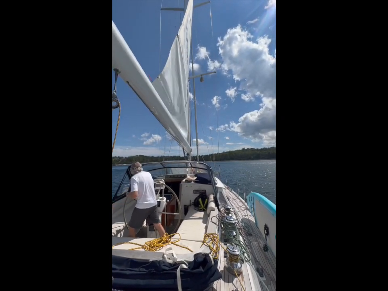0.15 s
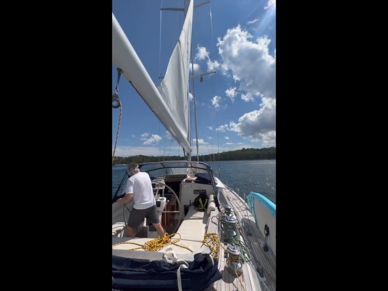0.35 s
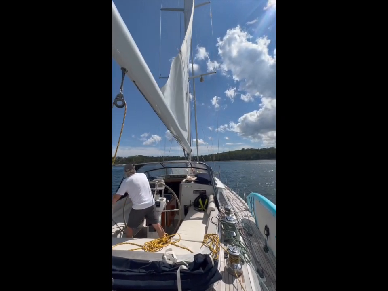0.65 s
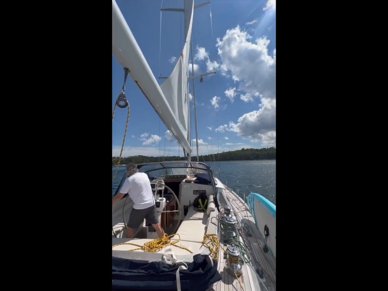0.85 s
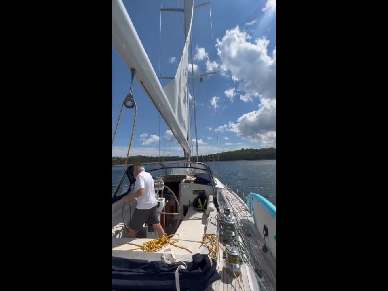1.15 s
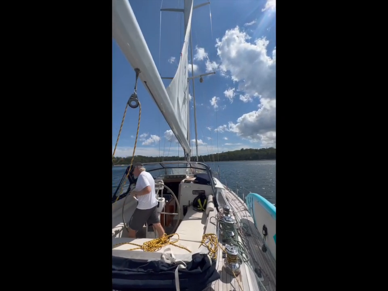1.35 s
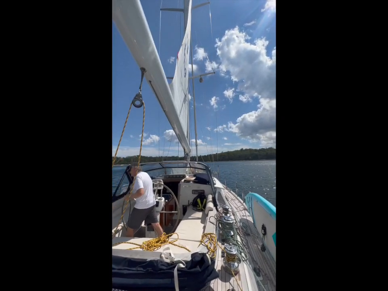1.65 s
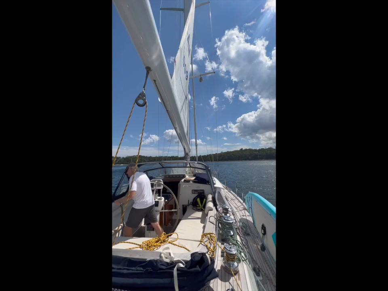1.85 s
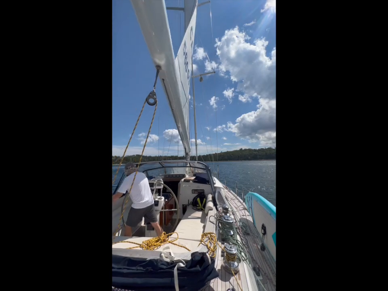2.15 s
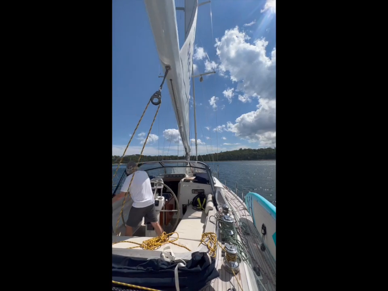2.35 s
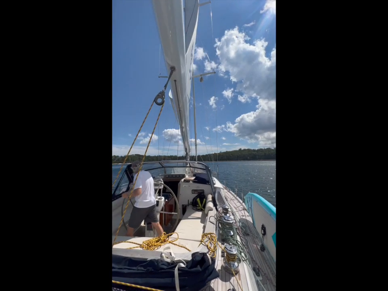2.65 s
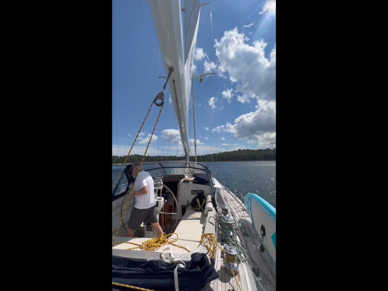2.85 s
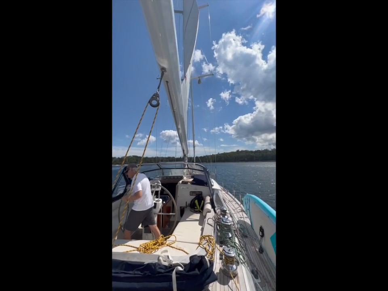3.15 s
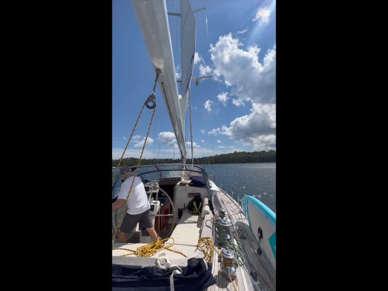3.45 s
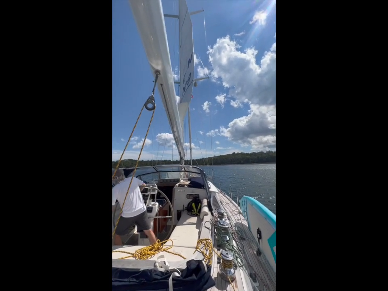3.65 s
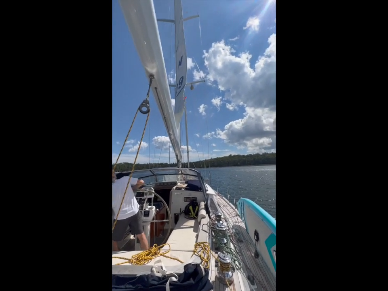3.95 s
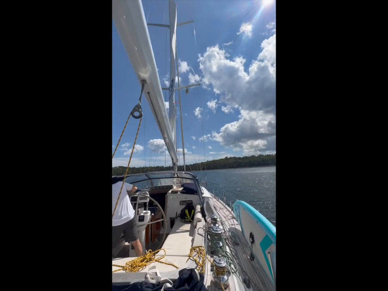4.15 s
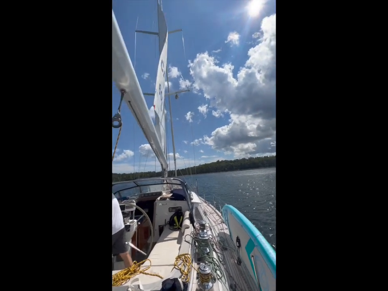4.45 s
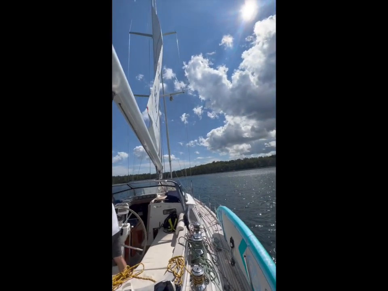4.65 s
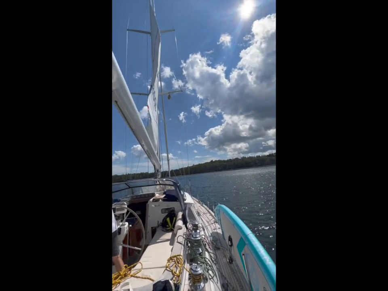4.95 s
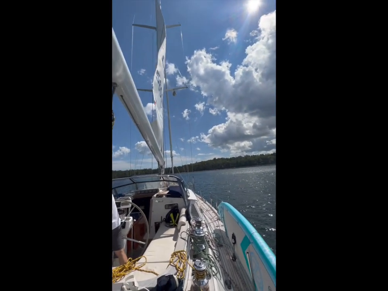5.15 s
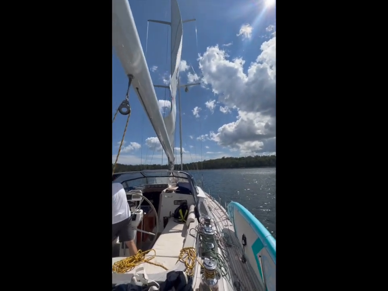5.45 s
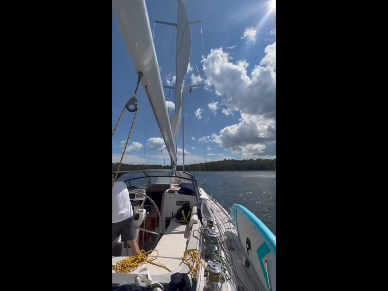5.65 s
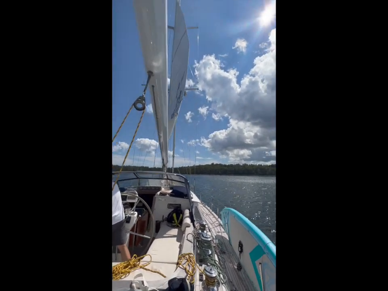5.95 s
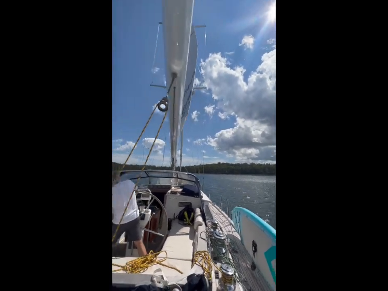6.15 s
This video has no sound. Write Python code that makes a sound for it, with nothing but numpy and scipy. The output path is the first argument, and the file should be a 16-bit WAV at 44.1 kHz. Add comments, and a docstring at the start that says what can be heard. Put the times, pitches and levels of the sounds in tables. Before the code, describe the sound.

Close in an open sailboat cockpit, a hand winch turns in bursts. Eight fast ratchet knocks, each grinding over, give way to heavy deck thuds, a brief sheave squeak and a sharp jerk of line. A second burst ends in bright slipping rope hiss; a third is short. A quieter stretch of soft bumps and light ticks follows before a last burst. Phone stereo, dry, with faint water beneath.

```python
"""A ratchet winch in a sailboat's cockpit hauls a line in bursts: each tooth knocks, then grinds over.
Knock and grind drive the resonances of the drum, and the rope dragging on it excites them too.
Slipping rope fibres hiss and rasp, gear thuds on the hollow deck, loose pawls tick and a sheave squeaks,
all as excited resonances, gliding tones or shaped noise. The slack sail rumbles and water adds noise.
A phone's two microphone ports hear it with a phase step between them."""
import sys
import numpy as np
from scipy import signal
from scipy.fft import rfft, irfft
from scipy.io import wavfile

SR = 44100
rng = np.random.default_rng(int(sys.argv[2]) if len(sys.argv) > 2 else 0)


def wrap_up_sound(samples):
    """Save the sound to the file named by the first command line argument, as 16-bit audio."""
    columns = np.atleast_2d(samples).T
    # keep every value between -1 and 1, then stretch to whole-number steps
    tamed = np.clip(columns, -1, 1)
    steps = np.round(tamed * 32767).astype(np.int16)
    wavfile.write(sys.argv[1], SR, steps)


N = 277477   # length [samples]
FFT_SIZE = 2 ** 19
OPPOSED_HZ = 12000   # from here up the direct gear sound reaches the ports in opposite phase


def amp(db):
    """Decibels to amplitude gain: 20 dB is a factor of ten."""
    return 10 ** (np.asarray(db) / 20)


def rms_one(x):
    """Normalize to unit root mean square."""
    return x / np.sqrt(np.mean(x ** 2) + 1e-20)


def in_time(rows):
    """Linear interpolation of a curve's columns, sample by sample."""
    s, *columns = np.transpose(rows)
    return [np.interp(np.arange(N) / SR, s, column) for column in columns]


def at_hz(points):
    """Interpolation of a spectrum along log frequency, on the transform's grid."""
    hz, value = np.transpose(points)
    grid_hz = np.arange(FFT_SIZE // 2 + 1) * SR / FFT_SIZE
    return np.interp(np.log(grid_hz + 1), np.log(hz + 1), value)


def through(x, response):
    """Linear filtering: the spectrum is multiplied by a frequency response."""
    return irfft(rfft(x, FFT_SIZE) * response)[:N]


def band(x, order, hz, kind):
    """Butterworth filtering: a maximally flat pass band."""
    return signal.sosfilt(signal.butter(order, hz, kind, fs=SR, output="sos"), x)


def drift(rate_hz):
    """Slow random modulation: noise through a double real pole, unit rms."""
    r = np.exp(-2 * np.pi * rate_hz / SR)
    settle = 9000   # samples dropped
    noise = rng.standard_normal(N + settle)
    return rms_one(signal.lfilter([1], [1, -2 * r, r * r], noise)[settle:])


def grains(per_s, spread_db):
    """Stick-slip friction as shot noise: random slips of uneven size, unit rms."""
    sizes = amp(spread_db * np.minimum(rng.exponential(1, N), 4)) * rng.standard_normal(N)
    return rms_one(sizes * (rng.random(N) < per_s / SR))


def ring(x, hz, t60):
    """Damped resonator: a unit click starts a decaying sine of unit initial amplitude."""
    r, w = amp(-60 / (t60 * SR)), 2 * np.pi * hz / SR
    return signal.lfilter([0, np.sin(w)], [1, -2 * r * np.cos(w), r * r], x + 1e-18)


def width_to_t60(width_hz):
    """Resonance bandwidth and decay time are inversely proportional."""
    return np.log(1000) / np.pi / width_hz


def clicks(times, db):
    """Ideal impacts: one impulse per event."""
    out = np.zeros(N)
    index = np.round(np.asarray(times) * SR).astype(int)
    np.add.at(out, np.clip(index, 0, N - 1), amp(db))
    return out


def swells(times, db, rise, fall):
    """Attack and exponential decay: an envelope topping out at each given time."""
    t = np.arange(round(0.2 * SR)) / SR
    shape = np.where(t < rise, np.sin(np.pi / 2 * t / rise) ** 2, np.exp(-(t - rise) / fall))
    return signal.fftconvolve(clicks(np.asarray(times) - rise, db), shape)[:N]


def cockpit(x):
    """Early reflections: two decaying random echo patterns, slowly exchanged as the phone sways."""
    # spectrum of the reflections: (frequency [Hz], level [dB])
    scatter = [(450, -61.5), (800, -23.5), (1300, 3.5), (2500, 0), (6000, -0.5), (11000, -7), (12500, -31)]
    t = np.arange(round(0.12 * SR)) / SR
    echoes = rng.standard_normal((2, len(t))) * np.exp(-t / 0.0036)
    first, second = (signal.fftconvolve(x, e / np.linalg.norm(e))[:N] for e in echoes)
    sway = 2.5 * drift(4)   # mixing angle [rad]
    return through(np.cos(sway) * first + np.sin(sway) * second, amp(at_hz(scatter)))


def two_ports(gear):
    """Phase difference between receivers: direct sound turned opposite ways, plus separate reflections."""
    # lead of the first port, ahead of the bass share: (frequency [Hz], phase [rad])
    port_lead = [(1200, -0.06), (2330, 2), (2840, 3), (3620, 3.5), (4650, 3.5), (5250, 0.5), (6290, -7.5),
                 (8610, -4.5), (9820, -8.5), (11300, -8)]
    # the bass reaches both ports alike: (frequency [Hz], share of the phase step [0 to 1])
    bass_alike = [(600, 0), (1200, 1)]
    lead = at_hz(port_lead + [(OPPOSED_HZ, -3 * np.pi)])
    turn = np.exp(0.5j * lead * at_hz(bass_alike))   # each port takes half the step
    return np.array([through(gear, turn) + cockpit(gear), through(gear, 1 / turn) + cockpit(gear)])


def water():
    """Broadband noise shaped by a spectrum, its level wavering slowly."""
    # water spectrum: (frequency [Hz], relative level [dB per Hz])
    water_colour = [(35, -36.5), (60, 3), (107, -3.5), (259, -14), (1250, -29), (1780, -31.5),
                    (2330, -36.5), (2540, -37), (5170, -40.5), (12000, -66), (15600, -101.5), (22000, -120)]
    noise = rms_one(through(rng.standard_normal(N), amp(at_hz(water_colour))))
    return amp(-64.5 + 1.9 * drift(23)) * noise


def sail():
    """Low-frequency shot noise: the slack sail rumbles and swells."""
    # rumble envelope: (time [s], level [dB])
    sail_level = [(0.0, -47.5), (0.46, -45.5), (0.56, -47.5), (0.73, -84), (0.98, -36), (1.31, -63.5),
                  (1.49, -62), (1.86, -31), (2.01, -49), (2.17, -51), (2.35, -54), (2.61, -73.5),
                  (2.79, -54.5), (3.06, -61.5), (3.54, -37.5), (3.82, -56.5), (4.13, -72.5), (4.45, -66.5),
                  (4.55, -71.5), (4.84, -49), (5.32, -75), (5.55, -77), (5.66, -48), (5.78, -44.5),
                  (6.03, -37.5), (6.13, -32.5), (6.19, -33), (6.29, -43.5)]
    # rumble spectrum: (frequency [Hz], relative level [dB per Hz])
    rumble_colour = [(18, -53), (30, -39.5), (69, -8), (257, 8.5), (352, 0), (423, -4), (668, -23.5),
                     (900, -29), (1170, -68), (1980, -120)]
    rumble_db, = in_time(sail_level)
    rumble = rms_one(through(grains(1000, 0.36), amp(at_hz(rumble_colour))))
    return amp(rumble_db + 3.4 * drift(23)) * rumble


def thuds():
    """Impact on a plate: a soft pitched push, a snap, a dull rattle behind and the deck's decaying modes."""
    # knocks on the deck: (time [s], push level [dB], pitch [Hz], t60 [s], snap reference level [dB])
    deck_knocks = [(0.061, -27, 105, 0.053, -64), (0.103, -30, 157, 0.066, -33),
                   (0.127, -26, 237, 0.03, -29.5), (0.239, -16.5, 138, 0.044, -21.5),
                   (0.259, -9, 306, 0.012, -16), (0.453, -22, 131, 0.021, -50), (0.625, -1, 189, 0.03, -33),
                   (0.887, -16.5, 184, 0.039, -41), (0.924, -8, 277, 0.089, -13.5),
                   (0.937, -7.5, 327, 0.1, -18), (0.942, -20, 322, 0.05, -27), (0.947, -33, 320, .03, -15),
                   (0.965, -17, 338, 0.14, -28), (0.977, -21, 308, 0.14, -40),
                   (1.011, -20, 318, 0.092, -41), (1.034, -30, 328, 0.033, -27),
                   (1.074, -32, 235, 0.07, -51), (1.291, -44, 327, 0.032, -39.5),
                   (1.359, -36.5, 155, 0.085, -78), (1.461, -49, 300, 0.022, -28),
                   (1.468, -27, 289, 0.11, -30), (1.5, -30, 203, 0.16, -41), (1.53, -26.5, 130, 0.029, -58),
                   (1.858, -16, 226, 0.036, -26), (2.349, -33, 298, 0.12, -50), (2.367, -28, 460, 0.1, -24),
                   (2.374, -22, 570, .05, -26), (2.398, -25, 495, 0.045, -19),
                   (2.381, -15.5, 348, 0.096, -14.5), (2.392, -33, 402, 0.046, -15),
                   (2.406, -19, 290, 0.095, -21), (2.447, -16.5, 209, 0.11, -37),
                   (2.46, -23, 316, 0.088, -26), (2.481, -18, 312, 0.043, -20.5),
                   (2.498, -27.5, 327, 0.09, -23), (2.675, -38, 147, 0.077, -69),
                   (2.792, -51, 219, .05, -53), (2.835, -22.5, 115, 0.042, -75),
                   (2.853, -21.5, 100.5, 0.054, -66), (2.87, -28, 130, 0.087, -62),
                   (2.915, -34, 295, 0.17, -54), (2.957, -22.5, 237.4, 0.027, -30.5),
                   (2.965, -28.5, 285, 0.13, -31), (3.006, -6.5, 186, 0.039, -19),
                   (3.039, -27, 208, 0.041, -29), (3.876, -50, 200, 0.13, -53.5),
                   (4.126, -28, 138.3, 0.14, -87), (4.159, -32, 227.6, 0.14, -66.5),
                   (4.182, -27.5, 198, 0.038, -59), (4.355, -29, 230, 0.041, -53),
                   (4.369, -31.5, 189, 0.072, -60.5), (4.392, -22.5, 167, 0.1, -48.5),
                   (4.42, -9.5, 276, 0.041, -19.5), (4.429, -34.5, 201, 0.052, -25.5),
                   (4.457, -44, 302, 0.042, -46), (4.491, -41.5, 151, 0.11, -59.5),
                   (4.575, -37.5, 220, 0.046, -58), (4.59, -31, 121, 0.064, -67),
                   (4.616, -15, 280, 0.012, -18), (4.619, -33, 202, 0.017, -34.5),
                   (4.647, -48, 293, 0.017, -40), (4.659, -37, 247, 0.03, -52),
                   (4.736, -28, 147, 0.032, -44), (4.759, -37, 448, 0.057, -43),
                   (4.767, -34.5, 416, 0.033, -46), (4.777, -32, 230, 0.044, -33.5),
                   (4.799, -30, 195, 0.056, -60), (4.818, -24, 399, 0.039, -64),
                   (4.86, -18, 183, 0.046, -54), (4.875, -25, 272, 0.051, -48),
                   (4.916, -45, 266, 0.076, -49), (4.968, -23.5, 295, 0.047, -19),
                   (4.973, -13.5, 222, 0.041, -33), (4.985, -22, 132, 0.048, -20.5),
                   (5.119, -27, 297, 0.025, -45), (5.122, -23, 430, 0.029, -41),
                   (5.132, -36.5, 144, 0.096, -47), (5.278, -42.5, 185, 0.071, -62.5),
                   (5.318, -36, 266, 0.021, -53.5), (5.855, -25.5, 308, 0.065, -50),
                   (5.905, -20.5, 331, 0.09, -40), (5.953, -24.5, 330, 0.16, -35),
                   (6.144, -27, 300, 0.044, -22.5), (6.151, -13, 268, 0.021, -18),
                   (6.169, -19, 222, 0.029, -21), (6.188, -22, 234, 0.048, -39),
                   (6.216, -27.5, 266, 0.28, -58), (6.251, -21, 260, 0.047, -52),
                   (6.262, -18, 172, 0.038, -54)]
    # modes of the hollow deck: (frequency [Hz], relative level [dB], t60 [s])
    deck_modes = [(122, 2.5, 0.075), (206, 6, 0.07), (315, -5.5, 0.019), (395, -15.5, 0.043),
                  (595, -11, 0.088), (790, -24.5, 0.017)]
    sag_share, sag_s = 0.097, 0.0016   # a push starts this share sharp and settles
    sweep_top_hz, sweep_end_hz, sweep_s = 1097, 255, 0.0027
    sweep_rise_s, sweep_fall_s = 0.0033, 0.0016
    out = np.zeros(N)
    mode_luck_db = rng.normal(0, 3, (len(deck_knocks), len(deck_modes)))
    s, push_db, _, _, snap_db = np.transpose(deck_knocks)
    t = np.arange(round(0.25 * SR)) / SR

    sag = sag_share * sag_s * (1 - np.exp(-t / sag_s))
    for at, db, hz, t60, _ in deck_knocks:
        build = 1 - np.exp(-(t * hz / 0.36) ** 2)   # builds over most of a cycle
        push = amp(db - 60 * t / t60) * np.sin(2 * np.pi * hz * (t + sag)) * build
        i = round(at * SR)
        out[i:i + len(t)] += push[:N - i]
    for k, (hz, db, t60) in enumerate(deck_modes):
        out += ring(clicks(s + 0.0027, push_db - 17.5 + db + mode_luck_db[:, k]), hz, t60)
    rattle = rms_one(band(rng.standard_normal(N), 2, [110, 450], "band"))
    out += swells(s + 0.048, push_db - 26.5, rise=0.015, fall=0.015) * rattle
    out = band(out, 3, 560, "low")

    snap = rms_one(band(rng.standard_normal(N), 2, [420, 800], "band"))
    out += swells(s + 0.018, snap_db - 30.5, rise=0.0084, fall=0.03) * snap
    # dispersion: the deck carries treble first, so a snap falls in pitch
    sweep_hz = sweep_end_hz + (sweep_top_hz - sweep_end_hz) * np.exp(-t / sweep_s)
    sweep = np.sin(2 * np.pi * np.cumsum(sweep_hz) / SR)
    sweep *= np.where(t < sweep_rise_s, (t / sweep_rise_s) ** 2,
                      np.exp(-(t - sweep_rise_s) / sweep_fall_s))
    out += signal.fftconvolve(clicks(s, snap_db + 3.5), sweep)[:N]
    return band(out, 6, 1250, "low")


def ticks():
    """Impact of small steel parts: a broadband crack and a short modal ring."""
    # loose pawls and shackles: (time [s], reference level [dB], ring over that level [dB])
    tick_events = [(0.257, -24, -8.5), (0.5844, -33, -31), (0.851, -25.5, -19), (0.928, -35, -9),
                   (1.007, -42.5, -8), (1.038, -35.5, -18), (1.2258, -54, -1), (1.7988, -41, -36),
                   (1.8377, -51.5, -17), (1.9594, -40.5, -29), (2.0233, -46, -27), (2.267, -28, -13),
                   (2.388, -29, -13), (2.447, -25, -30), (2.509, -31, -27.5), (2.749, -50, -11.5),
                   (2.758, -40, -27), (2.842, -70.5, 6), (2.971, -37.5, -36), (3.012, -36, -38),
                   (3.036, -43, -24), (3.5344, -54, -28), (3.6007, -27.5, -12.5), (3.724, -43.5, -32),
                   (3.98, -58.5, 1), (4.054, -56.5, -13), (4.733, -63.5, -18), (5.138, -53, -29.5),
                   (5.4506, -56.5, -1.5), (5.483, -50, -22), (5.585, -25.5, -40), (5.683, -26.5, -38),
                   (6.113, -26, -18.5), (6.235, -52, -3)]
    # modes of the small parts: (frequency [Hz], relative level [dB], t60 [s])
    pawl_modes = [(2500, 10.5, 0.0084), (3940, 1.5, 0.066), (5100, -3, 0.053), (5590, 4.5, 0.015),
                  (7040, -7, 0.05), (8100, -7, 0.055), (10100, -29, 0.025), (12370, -32, .03)]
    s, db, ring_db = np.transpose(tick_events)
    mode_luck_db = rng.normal(0, 4, (len(s), len(pawl_modes)))
    rings = np.zeros(N)
    for k, (hz, mode_db, t60) in enumerate(pawl_modes):
        rings += ring(clicks(s + 0.0016, db + ring_db + mode_db + mode_luck_db[:, k]), hz, t60)
    crack = band(grains(7500, 1.5), 2, [4000, 13000], "band")
    envelope = swells(s + 0.00059, db - 9.0, rise=0.0085, fall=0.0014)
    envelope += swells(s + 0.015, db - 21.0, rise=0.008, fall=0.0083)
    return band(rings, 2, [2200, 11000], "band") + envelope * crack


def pings():
    """Free vibration of one mode of drum or handle, started by a soft contact."""
    # pings: (time [s], level before softening [dB], pitch [Hz], t60 [s])
    ping_events = [(0.263, -16, 960, 0.04), (0.266, -20.5, 1356, 0.091), (0.908, -25, 1020, 0.065),
                   (0.944, -18.5, 1015, 0.074), (1.035, -26, 915, 0.048), (1.074, -36, 1068, 0.079),
                   (1.555, -27.5, 1710, 0.024), (1.564, -28.5, 1140, 0.044), (1.598, -34.5, 660, 0.068),
                   (2.282, -31.5, 1010, 0.044), (2.319, -26, 970, 0.047), (2.372, -30, 2300, 0.016),
                   (2.379, -34.5, 1706, 0.048), (3.603, -24, 1688, 0.023), (4.607, -53, 1850, .015),
                   (4.951, -42.5, 2550, 0.013), (5.048, -55, 2000, .012), (5.073, -61.5, 1800, 0.022),
                   (5.454, -42, 1075, 0.027), (5.488, -32, 930, .025), (6.157, -26.5, 1620, 0.02)]
    out = sum(ring(clicks([s], db), hz, t60) for s, db, hz, t60 in ping_events)
    return signal.fftconvolve(out, np.hanning(12) / 5.5)[:N]   # contact lasts a few samples


def squeak(rows):
    """Harmonic series on a gliding pitch: a wavering whistle with faint overtones, faded at both ends."""
    hz, db = in_time(rows)
    start, end = rows[0][0], rows[-1][0]
    fade = np.interp(np.arange(N) / SR, [start - 0.025, start + 0.0045, end, end + 0.0049], [0, 1, 1, 0])
    phase = 2 * np.pi * np.cumsum(hz * (1 + 0.00091 * drift(80))) / SR
    tone = np.sin(phase) + amp(-20) * np.sin(2 * phase) + amp(-23) * np.sin(3 * phase)
    return fade * amp(db + 2.5 * drift(50)) * tone


def sheave():
    """Harmonic tones in succession: the sheave squeaks on gliding pitches."""
    # one list per squeak: (time [s], mean pitch [Hz], mean level of the fundamental [dB])
    squeak_glides = [
        [(0.772, 1870, -31.5), (0.809, 1913, -35.5), (0.85, 1960, -31), (0.868, 1995, -34)],
        [(0.868, 5090, -52), (0.885, 4850, -62), (0.9, 4780, -62)],
        [(1.06, 4850, -61), (1.08, 4730, -70), (1.1, 4620, -56), (1.112, 4460, -68)],
    ]
    return sum(map(squeak, squeak_glides))


def rasps():
    """Resonance under stick-slip: the line in its blocks excites narrow bands, some briefly, some for seconds."""
    # rasps: (first fade time [s], second fade time [s], not always in order, centre [Hz],
    #         width of each of two resonators [Hz], relative level [dB])
    rasp_bands = [(0.031, 0.17, 1350, 450, -54.5), (0.8, 0.943, 1250, 320, -43.5),
                  (1.136, 1.22, 4250, 450, -55.5), (1.33, 1.367, 4030, 247, -59),
                  (1.295, 1.368, 7700, 2490, -62.5), (4.71, 4.735, 1773, 403, -65),
                  (4.742, 4.76, 1900, 500, -75), (6.2, 4, 2200, 500, -72), (2.5, 3.925, 640, 89, -58.5),
                  (3.975, 4.015, 2450, 400, -61), (1.524, 1.6, 1490, 440, -47),
                  (1.563, 1.643, 1130, 300, -44.5), (2.9, 2.42, 5270, 200, -50),
                  (2.43, 2.477, 4600, 440, -50), (4.83, 5.4, 6600, 1515, -81.5),
                  (4.6, 6.8, 1760, 470, -78.5), (3.1, 3.7, 3020, 680, -60), (5.415, 5.46, 1070, 200, -62.5),
                  (5.45, 5.55, 1036, 190, -49), (5.49, 5.61, 1160, 230, -44.5)]
    out, slips, t = np.zeros(N), grains(8000, 1.8), np.arange(N) / SR
    for first, second, hz, width, db in rasp_bands:
        t60, span = width_to_t60(width), second - first
        fade = np.interp(t, [first, first + 0.3 * span, second - 0.2 * span, second], [0, 1, 1, 0]) ** 2
        out += amp(db) * fade * rms_one(ring(ring(slips, hz, t60), hz, t60))
    return out * amp(2.0 * drift(30))


def swish():
    """Amplitude-modulated friction noise: the bright, uneven hiss of the line slipping back over the drum."""
    # envelope of the slip: (time [s], relative level [dB])
    swish_level = [(2.36, -74), (2.418, -41), (2.436, -49), (2.446, -40), (2.48, -50), (2.52, -63.5),
                   (2.532, -45), (2.565, -44.5), (2.587, -52), (2.612, -43), (2.66, -49), (2.7, -53),
                   (2.74, -71), (2.75, -53), (2.76, -56)]
    # spectrum of the hiss: (frequency [Hz], relative level [dB per Hz])
    swish_colour = [(3500, -27), (4800, -9.5), (6000, -1), (8500, 1), (11500, 2.5), (12800, -13.5),
                    (16000, -58)]
    start, end = swish_level[0][0], swish_level[-1][0]
    fade = np.interp(np.arange(N) / SR, [start - 0.01, start, end, end + 0.014], [0, 1, 1, 0])
    hiss = rms_one(through(grains(3600, 3.1), amp(at_hz(swish_colour))))
    return fade * amp(in_time(swish_level)[0] - 3.5 + 2.0 * drift(35)) * hiss


def line_levels():
    """Friction grows with load: rubbing and hiss [dB] through slack, take-up, full load, release and jerks."""
    # hauls: (take-up [s], full load [s], hiss ends [s], rubbing ends [s], hiss rise [s],
    #         take-up rubbing [dB], full rubbing [dB], hiss [dB])
    hauls = [(0.0, 0.164, 0.96, 0.65, 0.095, -53, -35, -53.5),
             (1.452, 1.638, 2.35, 2.32, 0.11, -52, -37.5, -54),
             (2.934, 3.162, 3.53, 3.62, 0.016, -48.5, -32.5, -57),
             (5.421, 5.573, 6.07, 6.05, 0.15, -56.5, -39.5, -50.5)]
    # the line jerks on the drum: (time [s], rubbing [dB], hiss [dB], hiss hold [s])
    jerks = [(0.862, -41.5, -43, 0.072), (0.923, -17.5, -47.5, 0.018), (1.032, -47, -46.5, 0.0069),
             (1.136, -42.5, -56.5, 0.086), (1.275, -58.5, -76, 0.085), (2.275, -43, -41, 0.019),
             (2.372, -27, -52.5, 0.046), (3.967, -61.5, -70, 0.038), (6.146, -48, -79.5, .01),
             (6.215, -66, -53.5, 0.029), (6.082, -35.5, -60, 0.011)]
    slack_rub_db, slack_hiss_db, first_hiss_db = -70.0, -101.5, -74
    load_s, jerk_rise_s = 0.04, 0.025
    rub_fall, hiss_fall = 200.5, 352   # after a haul [dB per s]
    jerk_rub_fall, jerk_hiss_fall = 161, 502   # after a jerk [dB per s]
    t = np.arange(N) / SR
    rub, hiss = np.full(N, slack_rub_db), np.full(N, slack_hiss_db)
    for start, full, hiss_end, rub_end, rise, first_db, rub_db, hiss_db in hauls:
        haul_rub = np.interp(t, [start, full - load_s, full, rub_end, rub_end + 1],
                             [first_db, first_db, rub_db, rub_db, rub_db - rub_fall], left=-200)
        haul_hiss = np.interp(t, [start, start + rise, hiss_end, hiss_end + 1],
                              [first_hiss_db, hiss_db, hiss_db, hiss_db - hiss_fall], left=-200)
        rub, hiss = np.maximum(rub, haul_rub), np.maximum(hiss, haul_hiss)
    for s, rub_db, hiss_db, hold in jerks:
        jerk_rub = np.interp(t, [s - jerk_rise_s, s, s + 1],
                             [slack_rub_db, rub_db, rub_db - jerk_rub_fall])
        jerk_hiss = np.interp(t, [s - jerk_rise_s / 2, s, s + hold, s + hold + 1],
                              [slack_hiss_db, hiss_db, hiss_db, hiss_db - jerk_hiss_fall])
        rub, hiss = np.maximum(rub, jerk_rub), np.maximum(hiss, jerk_hiss)
    return rub, hiss


def rope_hiss(hiss_db):
    """Sliding friction as dense shot noise: many small slips, shaped by a spectrum."""
    # rope spectrum: (frequency [Hz], relative level [dB per Hz])
    hiss_colour = [(1060, -57.5), (1800, -33.5), (1900, -18.5), (2410, -14.5), (3670, -18.5), (5010, -20),
                   (8910, -21.5), (11600, -27.5), (16000, -44.5)]
    hiss = rms_one(through(grains(10000, 2.5), amp(at_hz(hiss_colour))))
    return amp(hiss_db + 3.0 * drift(22)) * hiss


def drum(force):
    """Modal superposition: parallel resonances of alternating sign; unit noise leaves near unit level."""
    # winch drum and its mounting: (frequency [Hz], width [Hz], relative level [dB])
    drum_modes = [(313.8, 37, -5.5), (580.5, 50, 0.5), (686.3, 43, 4), (725, 84, 3.5), (927, 62, 2),
                  (975.4, 32, 2.5), (1028, 74, 1.5), (1101.3, 46, 1), (1233, 130, -1.5), (1386, 50, -8),
                  (1450, 77, -9.5), (1651, 33, -11.5), (1745, 59, -9), (1890, 940, -5.5), (2652, 63, -11.5),
                  (2743, 93, -16), (3200, 220, -28), (820, 550, -5)]
    out = np.zeros(N)
    for k, (hz, width, db) in enumerate(drum_modes):
        out += (-1) ** k * amp(db) * ring(force, hz, width_to_t60(width)) * np.sqrt(width / SR)
    return out


def winch(rub_db):
    """Forced vibration: knock, grind over the crest, weaker drop, pawl snap and rope drag drive the drum."""
    # ratchet teeth: (time [s], knock reference level [dB], grind reference level [dB],
    #                 pawl snap delay [s], snap level [dB])
    teeth = [(0.164, -15, -25.5, 0.048, -11), (0.258, -8.5, -26, 0.0088, -8), (0.33, -13, -25, 0.027, -25),
             (0.412, -10.5, -24.5, 0.019, -3), (0.494, -13, -22, 0.036, -15.5),
             (0.57, -10, -23.5, 0.011, -10.5), (0.645, -8.5, -22.5, 0.045, 7),
             (0.745, -19.5, -28, 0.018, -10), (1.562, -43, -50.5, 0.013, -18), (1.641, -13, -25, 0.017, -8),
             (1.731, -13, -23, 0.028, -6.5), (1.825, -12.5, -23.5, 0.033, -15),
             (1.916, -13, -23.5, 0.028, 3), (2.005, -13.5, -24, 0.038, -11), (2.095, -15, -25.5, 0.024, -9),
             (2.178, -13, -26.5, 0.035, -15.5), (2.269, -43.5, -55, 0.013, -21.5),
             (3.124, -13.5, -28, 0.034, -12), (3.22, -15.5, -26.5, 0.028, -10.5),
             (3.309, -14, -23.5, 0.031, -12), (3.398, -11.5, -24.5, 0.031, -10),
             (3.48, -14, -23.0, 0.035, -4), (3.58, -23, -34, 0.026, -12), (5.6, -12.5, -25.5, 0.028, -11.5),
             (5.689, -12.5, -25.5, 0.031, 1.5), (5.797, -12.5, -26.5, 0.036, -9),
             (5.892, -13.5, -24.5, 0.041, -2), (5.992, -13.5, -25, 0.022, -14),
             (6.144, -18, -39, 0.037, -15)]
    # the grind crests about 27 ms after the tooth, a little sooner when teeth follow faster
    crest_share, travel_cap_s = 0.35, 0.078
    treble_db, treble_follows, usual_grind_db = -40, 0.95, -23.5   # treble at the usual grind; share of its swing
    s, knock_db, grind_db, snap_s, snap_db = np.transpose(teeth)
    travel = np.minimum(np.diff(s, append=s[-1] + 1), travel_cap_s)
    crest = s + crest_share * travel

    knock = swells(s + 0.0012, knock_db - 12, rise=0.008, fall=0.006) * grains(20000, 0.24)
    knock += clicks(s, knock_db + 3)   # a single blow inside the knock
    # the first contact is the softer one
    dull = signal.lfilter(*signal.butter(2, 900, fs=SR), knock) + amp(3.0) * knock

    grind = swells(crest, grind_db + 2.0, rise=0.024, fall=0.01)
    grind += swells(crest + 0.016, grind_db - 2.5, rise=0.011, fall=0.008)
    grind += swells(crest + 0.021, grind_db - 9.5, rise=0.0024, fall=0.0021)
    snap = clicks(s + snap_s, snap_db)   # the pawl snaps home
    hard = snap + grind * grains(20000, 1.8)
    # steel on steel reaches the upper modes
    bright = hard + amp(-3.5) * signal.lfilter(*signal.butter(2, 1200, "high", fs=SR), hard)

    # each crest drags the rope
    drag = amp(rub_db) + swells(crest + 0.035, grind_db - 13.5, rise=0.024, fall=0.058)
    rub = drag * amp(2.6 * drift(9.5)) * grains(3000, 0.9)
    # rope is soft: it leaves the upper modes still
    soft_rub = signal.lfilter(*signal.butter(2, 1300, fs=SR), rub)

    hollow_note = ring(clicks(s + 0.004, knock_db - 12), hz=635, t60=0.062)
    body = drum(dull + bright + soft_rub) + hollow_note

    # treble of the grind: (frequency [Hz], relative level [dB per Hz])
    grit_colour = [(1470, -39.5), (2500, 1), (2720, -4.5), (3230, -6), (4200, -13.5), (9150, -19.5),
                   (11300, -33), (12400, -35), (15000, -37.5), (16000, -44)]
    grit = rms_one(through(grains(9000, 1.7), amp(at_hz(grit_colour))))
    tooth_treble_db = treble_db + treble_follows * (grind_db - usual_grind_db)
    rattle = amp(rub_db - 24)   # the gears rattle on between teeth
    return body + (swells(crest, tooth_treble_db, rise=0.035, fall=0.021) + rattle) * grit


def scene():
    """Superposition: gear reaches the ports by phase step and reflections, dull sounds arrive alike."""
    rub_db, hiss_db = line_levels()
    tick = ticks()
    # the sharpest edge of a tick reaches both ports alike
    edge = amp(-14.5) * band(tick, 4, OPPOSED_HZ, "high")
    gear = water() + tick + pings() + sheave() + rasps() + swish() + rope_hiss(hiss_db) + winch(rub_db)
    return two_ports(gear) + edge + thuds() + sail()


def record(dry):
    """Band limiting: the microphone drops the deep bass and the top is cut."""
    thin = band(dry, 2, 80, "high")
    # 70 dB down from 16.4 kHz up
    return signal.sosfilt(signal.cheby2(12, 70, 16400, fs=SR, output="sos"), thin)


dry = scene()
out = record(dry)
wrap_up_sound(out)
```